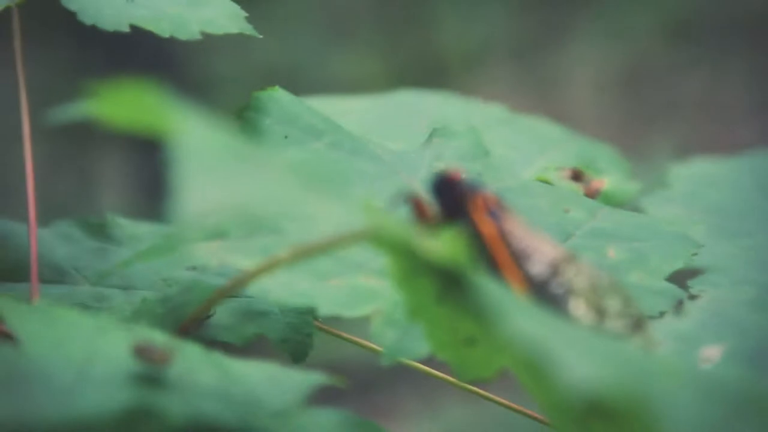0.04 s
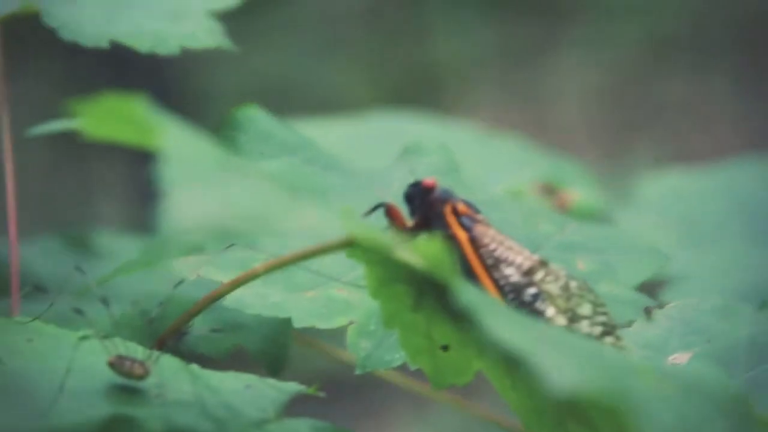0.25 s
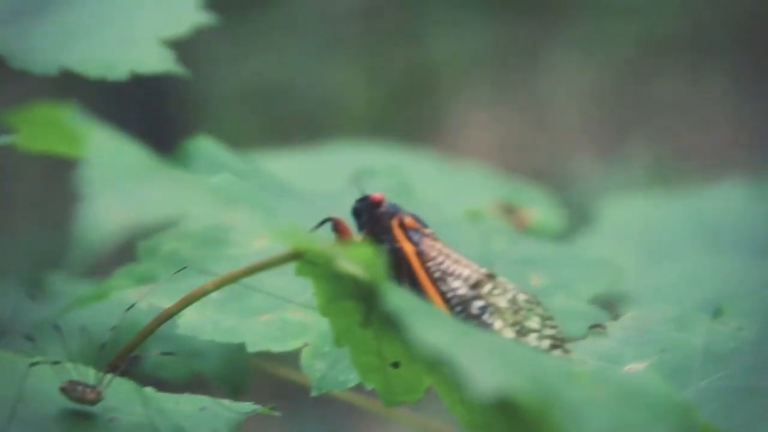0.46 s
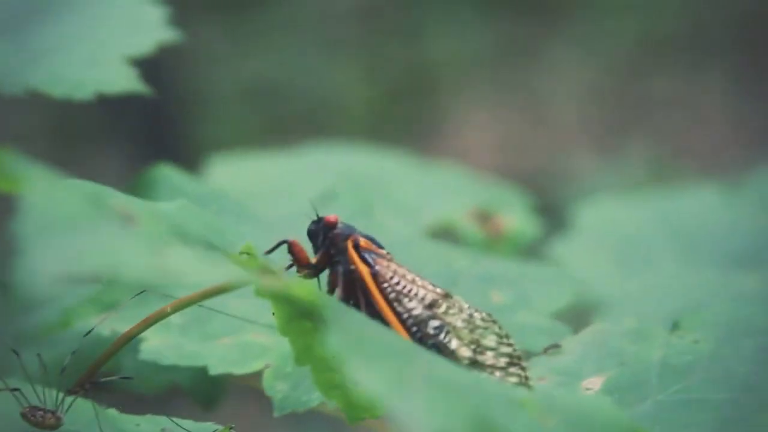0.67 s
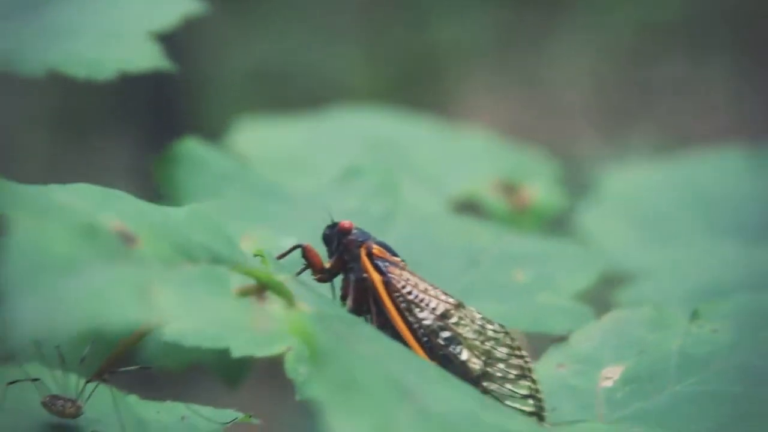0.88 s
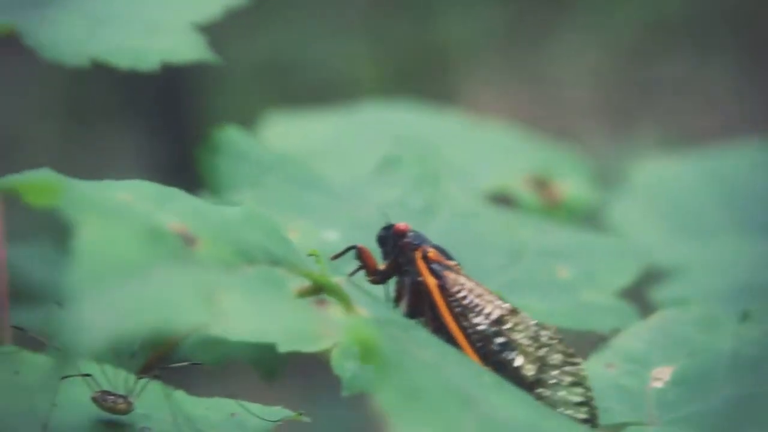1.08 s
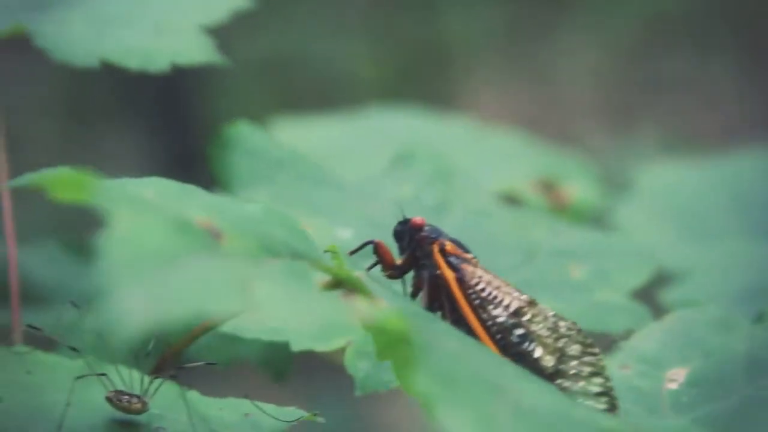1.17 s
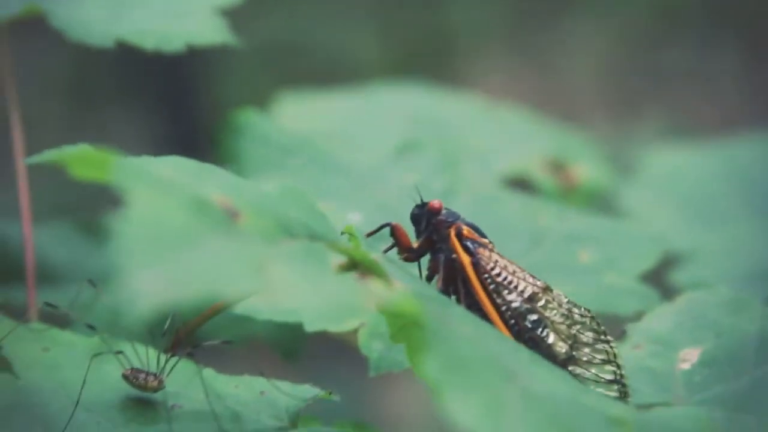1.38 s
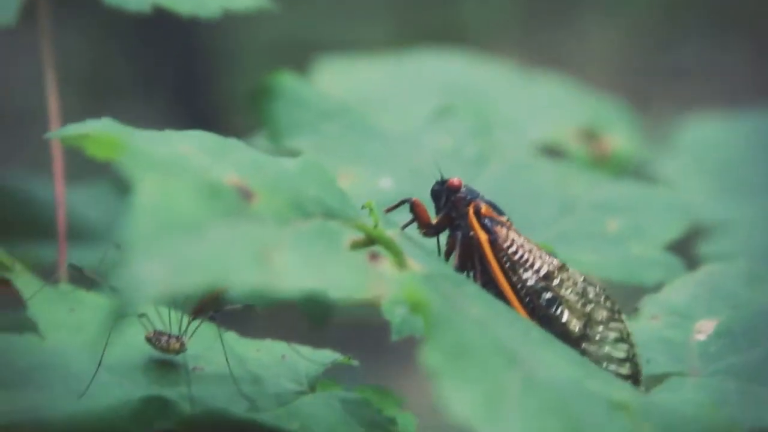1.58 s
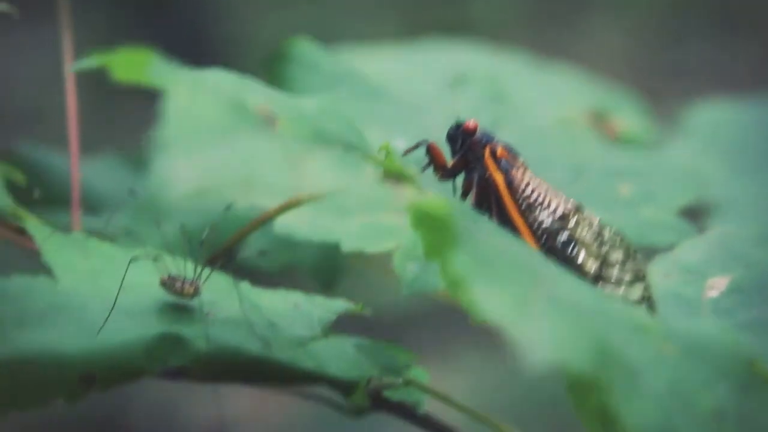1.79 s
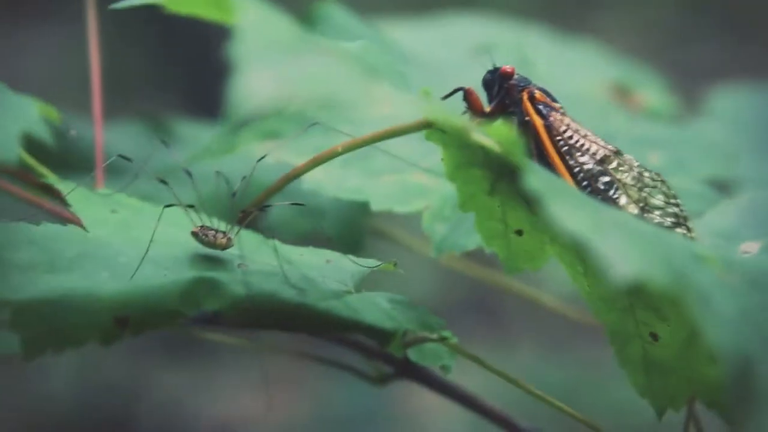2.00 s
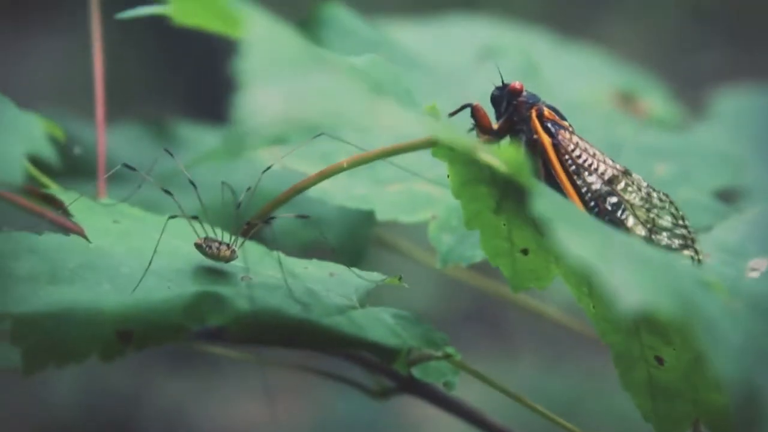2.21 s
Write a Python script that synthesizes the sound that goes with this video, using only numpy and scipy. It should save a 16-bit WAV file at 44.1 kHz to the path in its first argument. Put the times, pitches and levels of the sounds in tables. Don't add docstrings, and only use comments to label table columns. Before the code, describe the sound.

Many cicadas drone together in woodland, closer buzzing pulses standing out over small leaf and twig taps

```python
import sys
import numpy as np
from scipy import signal
from scipy.io import wavfile

SR = 44100
rng = np.random.default_rng(int(sys.argv[2]) if len(sys.argv) > 2 else 0)


def gain_from_db(level_db):
    decades = np.asarray(level_db, float) / 20
    return 10 ** decades


def dump(signal):
    limited = np.clip(np.atleast_2d(signal).T, -1, 1)
    pcm = np.round(limited * 32767).astype(np.int16)
    wavfile.write(sys.argv[1], SR, pcm)


N = 98916


def rms_one(x):
    return x / np.sqrt(np.mean(x ** 2) + 1e-20)


def drift(rate_hz):
    r = np.exp(-2 * np.pi * rate_hz * 40 / SR)
    noise = rng.standard_normal(N // 40 + 2002)
    slow = signal.lfilter([1], [1, -2 * r, r * r], noise)[2000:]
    return np.interp(np.arange(N) / 40, np.arange(len(slow)), rms_one(slow))


def resonate(x, hz, width_hz):
    r = np.exp(-np.pi * width_hz / SR)
    b = (1 - r * r) / 2 * np.array([1, 0, -1])
    a = [1, -2 * r * np.cos(2 * np.pi * hz / SR), r * r]
    return signal.lfilter(b, a, x + 1e-18)


def steep(x, hz, width_hz):
    return resonate(resonate(x, hz, width_hz), hz, width_hz)


def tymbal(swell_db):
    clicks_per_s, jitter, spread_db = 160, .25, 1
    chance = rng.standard_normal((1200, 2))
    mean_gap_s = (1 + .15 * rng.uniform(-1, 1)) / clicks_per_s
    gaps_s = mean_gap_s * np.exp(jitter * chance[:, 0])
    at = ((np.cumsum(gaps_s) - gaps_s[0] * rng.random()) * SR).astype(int)
    inside = at < N
    clicks = np.zeros(N)
    clicks[at[inside]] = gain_from_db(spread_db * chance[inside, 1])
    return clicks * gain_from_db(swell_db * drift(1.24))


def chorus():
    singers, song_hz, spread_hz, width_hz, song_db = 28, 1311.2, 56.3, 112, -35.5
    skirt_hz, skirt_width_hz, skirt_db = 1247, 255, -45.5
    flicker_db = 1.5
    # (time [s], level [dB])
    chorus_swell = [(0, -30.5), (.28, -35), (.56, -34), (.84, -32), (1.12, -35.5), (1.3, -31), (1.55, -34),
                    (1.8, -33), (2.0, -31.5), (2.24, -35.5)]
    # (centre [Hz], width [Hz], level [dB])
    overtones = [(2538, 210, -58), (2406, 215, -64.5), (3452, 150, -65.5), (3910, 440, -65),
                 (1650, 38, -59)]
    detune = rng.standard_normal(singers)
    detune = rms_one(detune - detune.mean())
    clicks = [tymbal(swell_db=5) for _ in detune]
    crowd = sum(clicks)
    song = sum(steep(c, song_hz + spread_hz * d, width_hz) for c, d in zip(clicks, detune))
    effort_db = np.interp(np.arange(N) / SR, *np.transpose(chorus_swell))
    out = gain_from_db(song_db + effort_db - effort_db.mean()) * rms_one(song)
    out += gain_from_db(skirt_db) * rms_one(steep(crowd, skirt_hz, skirt_width_hz))
    for hz, overtone_width_hz, db in overtones:
        shifted = np.roll(crowd, int(rng.integers(N)))
        tone = rms_one(steep(shifted, hz, overtone_width_hz))
        out += gain_from_db(db + flicker_db * drift(3.4)) * tone
    return out


def near_singers():
    width_hz, gain_db, lead_s = 60, -5.5, .003
    # (time [s], peak level [dB], abdomen pitch [Hz])
    surges = [(0.0605, -27, 1342), (0.0823, -21, 1282), (0.0997, -29, 1390), (0.176, -30, 1287),
              (0.2003, -23, 1296), (0.2344, -24.5, 1346), (0.2586, -18.5, 1309), (0.2814, -24, 1322),
              (0.32, -34, 1386), (0.338, -22, 1323), (0.3788, -25, 1279), (0.4135, -24.5, 1293),
              (0.4394, -27.5, 1304), (0.4687, -18.5, 1339), (0.5156, -21.5, 1347), (0.556, -32, 1380),
              (0.607, -22, 1370), (0.6823, -20.5, 1320), (0.7146, -33, 1390), (0.732, -27, 1348),
              (0.7535, -28, 1250), (0.7873, -26, 1300), (0.864, -29, 1363), (0.9126, -22, 1340),
              (0.954, -22, 1334), (0.9925, -27.5, 1378), (1.0276, -23, 1360), (1.0774, -25.5, 1284),
              (1.1075, -20.5, 1347), (1.1233, -20, 1332), (1.1817, -17, 1343), (1.2285, -23.5, 1291),
              (1.273, -20, 1299), (1.3193, -26, 1362), (1.3703, -19, 1293), (1.4229, -20.5, 1352),
              (1.4627, -34, 1363), (1.49, -20, 1281), (1.527, -35, 1353), (1.557, -26, 1370),
              (1.5832, -24, 1236), (1.6366, -21.5, 1344), (1.7273, -30, 1299), (1.7674, -22.5, 1314),
              (1.8008, -20, 1364), (1.8143, -25, 1297), (1.8563, -21, 1387), (1.9019, -31, 1293),
              (1.927, -25, 1420), (1.954, -24, 1407), (1.9755, -23.5, 1317), (2.0624, -22, 1435),
              (2.0884, -19, 1372), (2.1326, -17.5, 1317), (2.1857, -19.5, 1303), (2.2102, -25, 1350)]
    out, t = np.zeros(N + SR), np.arange(SR // 10) / SR
    damping = np.pi * width_hz * t
    swell = damping * np.exp(1 - damping)
    for (s, db, hz), turn in zip(surges, rng.random(len(surges))):
        start = max(int((s - lead_s) * SR), 0)
        out[start:start + len(t)] += gain_from_db(db + gain_db) * swell * np.sin(2 * np.pi * (hz * t + turn))
    return out[:N]


def sagging_singers():
    low_hz, high_hz, width_hz, level_db, cut_hz = 834.5, 1117, 130, -49, 630
    pitches_hz = np.geomspace(low_hz, high_hz, 12)
    voices = sum(steep(tymbal(swell_db=1.5), hz, width_hz) for hz in pitches_hz)
    high_pass = signal.butter(4, cut_hz, "high", fs=SR, output="sos")
    return gain_from_db(level_db) * rms_one(signal.sosfilt(high_pass, voices))


def glide(s, length_s, from_hz, to_hz, db, curl):
    u = np.clip((np.arange(N) / SR - s) / length_s, 0, 1)
    pitch_hz = from_hz + (to_hz - from_hz) * u ** curl
    envelope = np.sqrt(2 * np.sin(np.pi * u))
    return gain_from_db(db) * envelope * np.sin(2 * np.pi * np.cumsum(pitch_hz) / SR)


def bird_chips():
    # (time [s], start pitch [Hz], top pitch [Hz], level [dB], lateness of rise [exponent])
    chip_rows = [
        (0.742, 8110, 9400, -58.5, 5.0),
        (0.748, 8750, 9050, -63, 1.5),
        (1.648, 8050, 9500, -55, 2.3),
    ]
    length_s = .0145
    return sum(glide(s, length_s, *row) for s, *row in chip_rows)


def far_whistles():
    # (time [s], length [s], start pitch [Hz], end pitch [Hz], level [dB])
    whistle_rows = [
        (.308, .018, 2950, 3200, -59),
        (.324, .016, 3200, 3000, -61),
        (.398, .03, 4000, 3650, -63),
        (.425, .05, 3700, 2800, -56),
        (.468, .036, 2540, 2120, -59),
    ]
    return sum(glide(*row, curl=0.86) for row in whistle_rows)


def trunks(x):
    smear_s = .003
    # (delay [s], level [dB])
    trunk_rows = [(.006, -4), (.021, -4), (.043, -6), (.060, -7), (.088, -7), (.111, -11), (.136, -12),
                  (.155, -12), (.182, -15)]
    t, echoes = np.arange(SR // 4) / SR, 0
    for (s, db), noise in zip(trunk_rows, rng.standard_normal((len(trunk_rows), len(t)))):
        smear = noise * np.exp(-((t - s) / smear_s) ** 2)
        echoes = echoes + gain_from_db(db) * smear / np.sqrt(np.sum(smear ** 2))
    return signal.fftconvolve(x, echoes)[:N]


def wood(x):
    far_t60_s, near_t60_s, near_db = 1.0, .3, 2.0
    gap_s, sparse_db, level_db = .002, 2.0, 1.5
    t = np.arange(N) / SR
    decay = gain_from_db(-60 * t / far_t60_s) + gain_from_db(near_db - 60 * t / near_t60_s)
    echoes = rng.standard_normal(N) * gain_from_db(sparse_db * drift(60.0)) * decay * (t > gap_s)
    return gain_from_db(level_db) * signal.fftconvolve(x, echoes / np.sqrt(np.sum(echoes ** 2)))[:N]


def taps(rows, width_share):
    attack_s = .0006
    out, t = np.zeros(N + SR), np.arange(SR // 5) / SR
    for (s, db, hz, t60_s), noise in zip(rows, rng.standard_normal((len(rows), len(t)))):
        envelope = gain_from_db(-60 * t / t60_s) * np.minimum(t / attack_s, 1)
        burst = steep(noise * envelope, hz, width_share * hz)
        start = int(s * SR)
        out[start:start + len(t)] += gain_from_db(db) * burst / np.abs(burst).max()
    return out[:N]


def leaf_ticks():
    # (time [s], peak level [dB], centre [Hz], t60 [s])
    tick_rows = [(.097, -55, 13000, .006), (.2129, -44.5, 12000, .006), (.3975, -44, 11000, 0.013),
                 (.421, -53, 13000, .006), (.476, -52, 13000, .006), (.521, -48, 13000, .006),
                 (.6863, -41.5, 12500, 0.0074), (.872, -51, 11900, .01), (1.062, -45, 12500, 0.032),
                 (1.1952, -45, 12000, .005), (1.2625, -52, 11000, 0.034), (1.4167, -45, 11500, 0.027),
                 (1.484, -50, 13000, .006), (1.716, -58, 12500, .01), (2.1076, -44.5, 10000, 0.027),
                 (2.116, -48, 12800, .06), (2.125, -50, 12800, 0.06), (2.134, -55, 12000, .03),
                 (2.195, -53, 10500, .01)]
    return taps(tick_rows, width_share=.9)


def twig_knocks():
    # (time [s], peak level [dB], centre [Hz], t60 [s])
    knock_rows = [
        (.143, -43, 2400, .06),
        (.144, -48, 3900, .05),
        (.872, -44, 3400, .05),
        (.873, -48, 5000, .04),
        (1.264, -51, 3900, .035),
        (1.350, -50, 3400, .04),
        (1.417, -47, 4000, .035),
        (2.110, -47, 4000, .05),
    ]
    return taps(knock_rows, width_share=.6)


def rustle():
    grains_per_s = 4500
    # (centre [Hz], width [Hz], level [dB])
    rustle_bands = [(3630, 3000, 1), (8650, 4800, -5), (11800, 5800, -7)]
    # (time [s], level [dB])
    rustle_level = [(0, -53), (.03, -57), (.15, -55.5), (.24, -67), (.35, -88), (2.3, -116)]
    hits = rng.random(N) < grains_per_s / SR
    grains = hits * rng.standard_normal(N) * gain_from_db(0.97 * drift(30.0))
    rubbed = sum(gain_from_db(db) * rms_one(steep(grains, hz, width_hz)) for hz, width_hz, db in rustle_bands)
    return gain_from_db(np.interp(np.arange(N) / SR, *np.transpose(rustle_level))) * rubbed


def leaves():
    dull_hz = 12900
    low_pass = signal.butter(2, dull_hz, fs=SR, output="sos")
    return signal.sosfilt(low_pass, leaf_ticks() + twig_knocks() + rustle())


def stem_thumps():
    swell_s, gain_db = .0093, 8
    # (time [s], peak level [dB], pitch [Hz], t60 [s])
    thump_rows = [
        (.002, -58, 71, 0.06),
        (0.578, -57, 252, 0.11),
        (0.671, -61, 92, 0.083),
        (0.869, -56, 198, 0.045),
        (1.063, -53, 313, .09),
        (1.071, -59, 90, 0.08),
        (1.418, -64, 121, 0.081),
        (1.731, -67, 66.6, 0.2),
        (2.104, -48, 311, 0.076),
        (2.107, -61, 113, 0.18),
    ]
    out, t = np.zeros(N + SR), np.arange(SR // 4) / SR
    for s, db, hz, t60_s in thump_rows:
        envelope = gain_from_db(db + gain_db - 60 * t / t60_s) * (1 - np.exp(-t / swell_s))
        start = int(s * SR)
        out[start:start + len(t)] += envelope * np.sin(2 * np.pi * hz * t)
    return out[:N]


def hush():
    level_db, patchy_db = -53, 1.0
    # (frequency [Hz], density [dB per Hz])
    hush_spectrum = [(30, -16.5), (110, -5), (500, 1), (2000, 1), (4500, -6.5), (7000, -13.5), (12000, -16),
                     (15600, -32)]
    hz, db = np.transpose(hush_spectrum)
    edges_hz = 20 * 2 ** np.arange(0, 10.1, 1 / 3)
    out, together, white = 0, drift(6.0), rng.standard_normal((2, N))
    for k, (low_hz, high_hz) in enumerate(zip(edges_hz, edges_hz[1:])):
        band_pass = signal.butter(2, [low_hz, high_hz], "band", fs=SR, output="sos")
        band = signal.sosfilt(band_pass, white[k % 2])
        band_db = np.interp(np.log(low_hz * high_hz) / 2, np.log(hz), db)
        out = out + gain_from_db(band_db + patchy_db * (0.47 * together + drift(6.1))) * band
    return gain_from_db(level_db) * rms_one(out)


def scene():
    throb_db, throb_hz, whistle_echo_db = .3, 35, -27
    insects = chorus() * gain_from_db(throb_db * drift(throb_hz)) + near_singers() + sagging_singers()
    chips, far = bird_chips(), far_whistles()
    birds = chips + trunks(chips) + far + wood(chips + gain_from_db(whistle_echo_db) * far)
    return (insects + birds + leaves() + stem_thumps() + hush())[None]


def top_cut(x):
    return signal.sosfilt(signal.butter(12, 15730, fs=SR, output="sos"), x)


def record(dry):
    return top_cut(dry)


dry = scene()
out = record(dry)
dump(out)
```